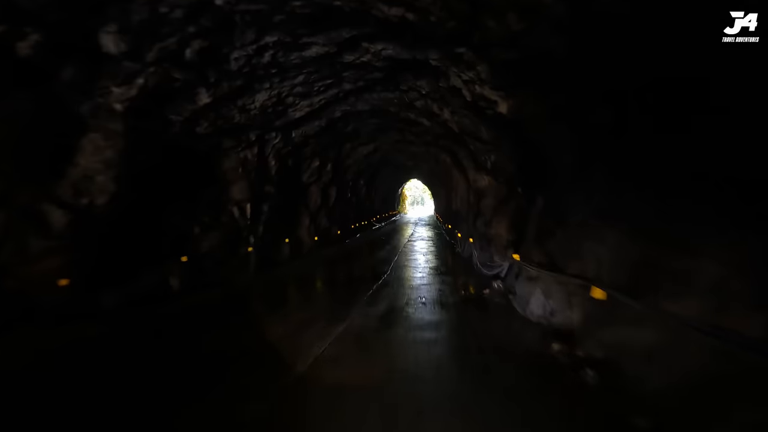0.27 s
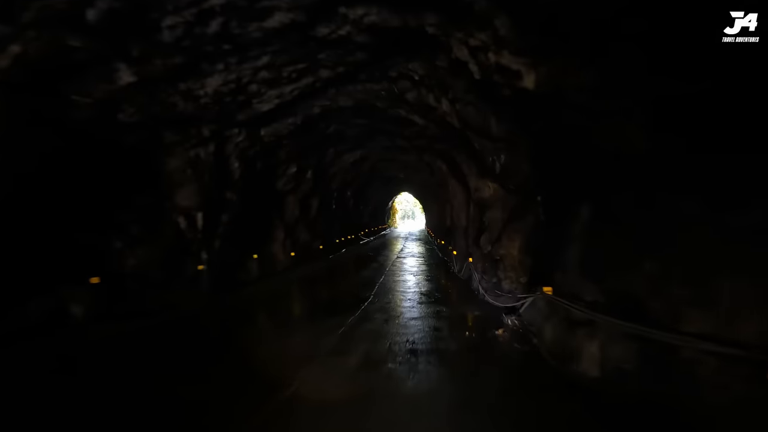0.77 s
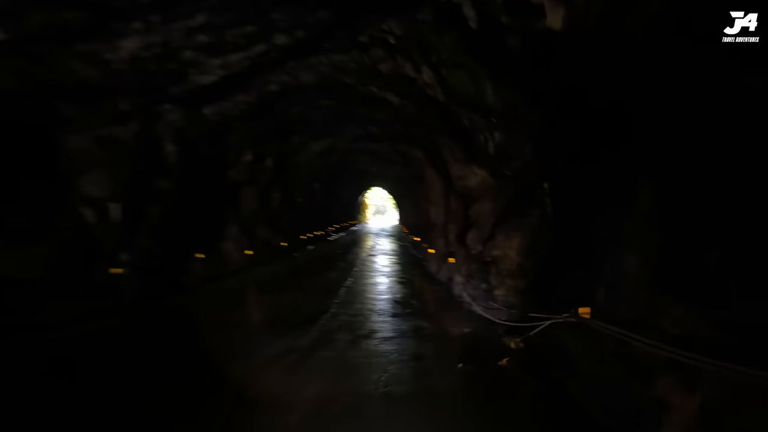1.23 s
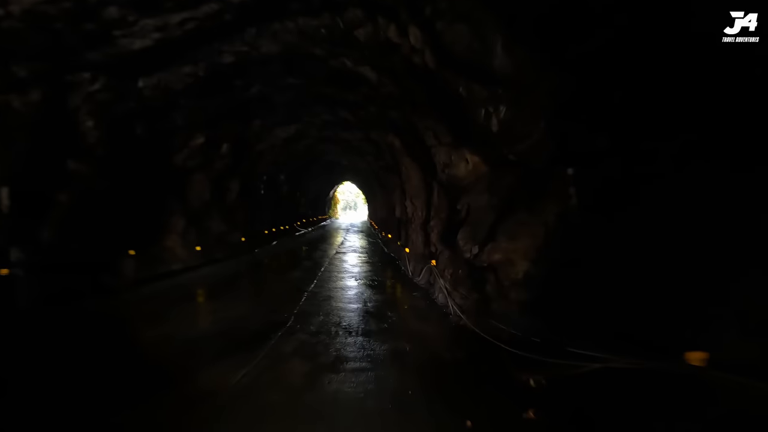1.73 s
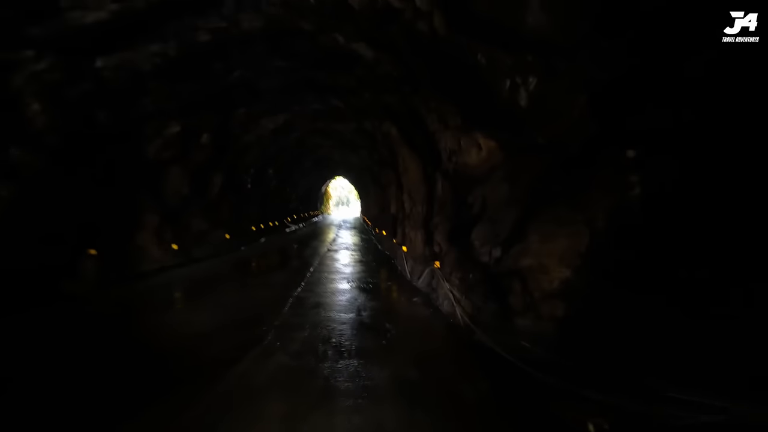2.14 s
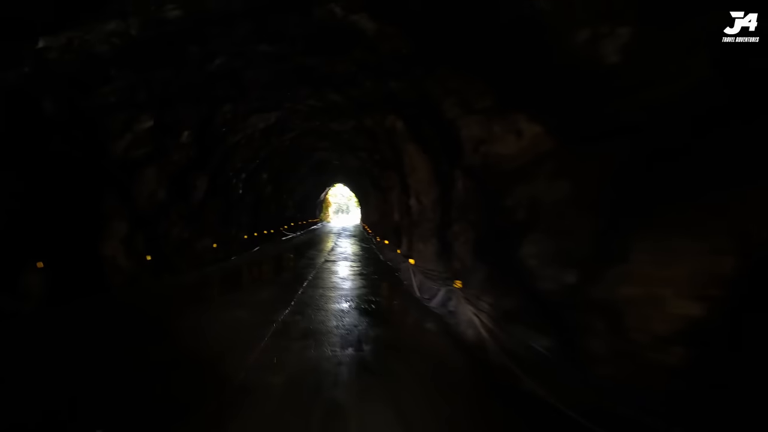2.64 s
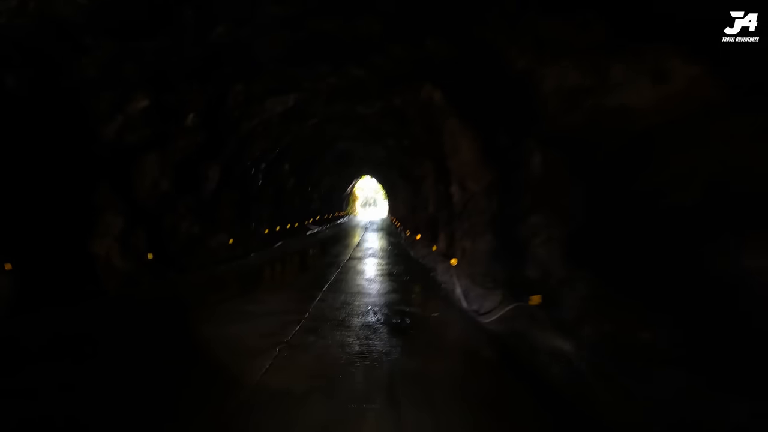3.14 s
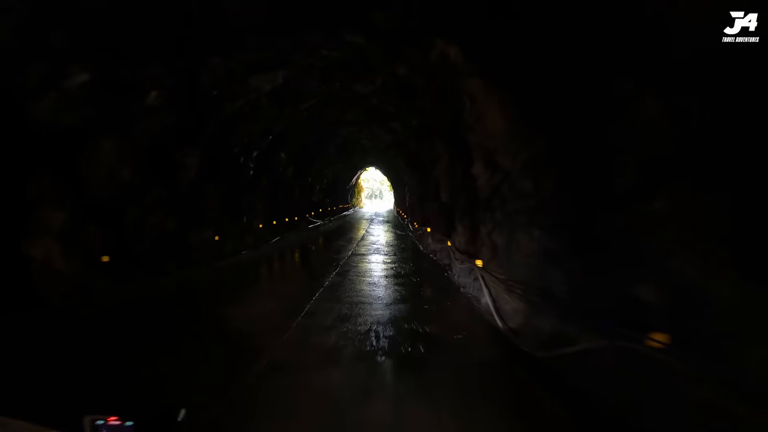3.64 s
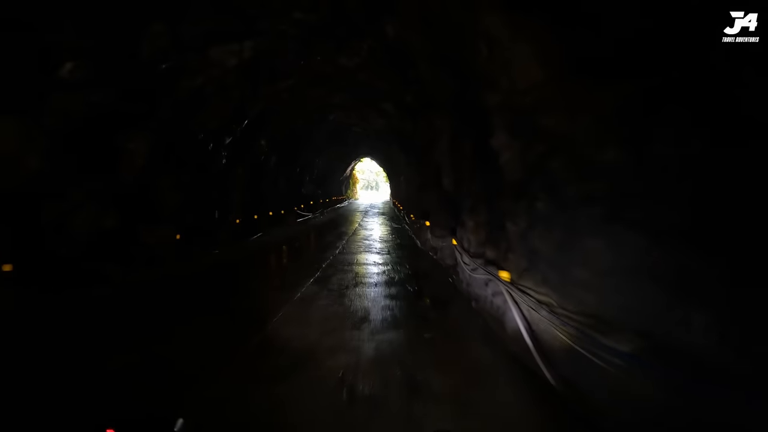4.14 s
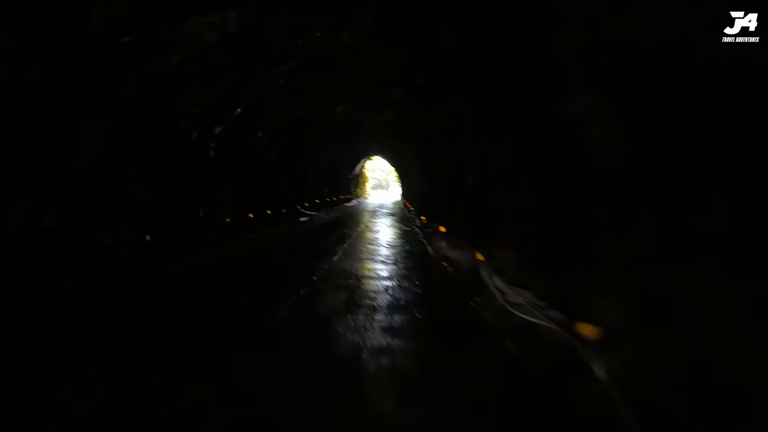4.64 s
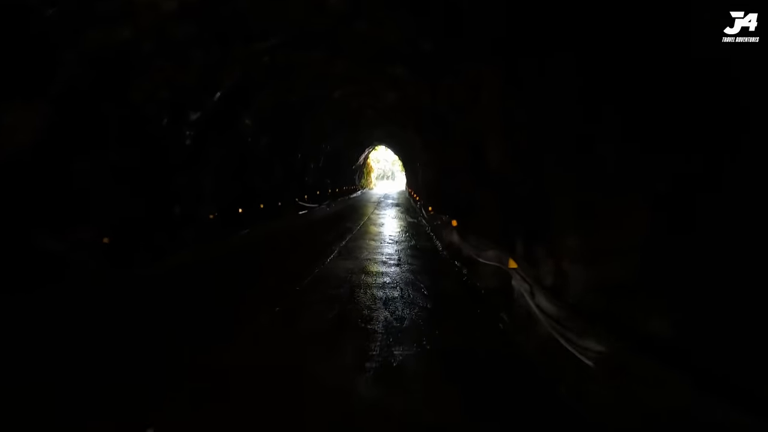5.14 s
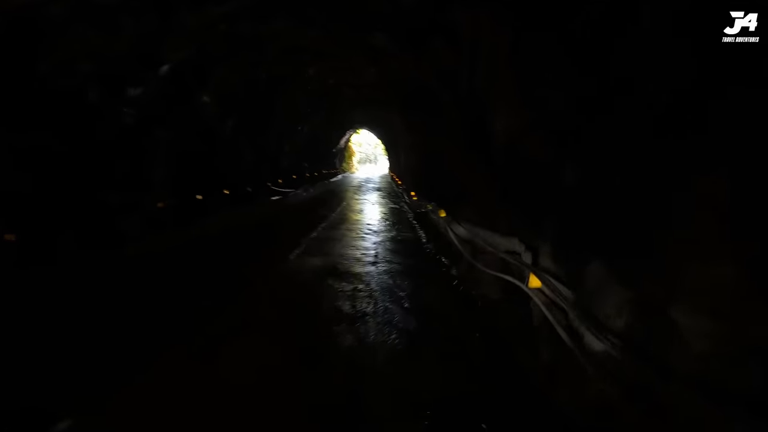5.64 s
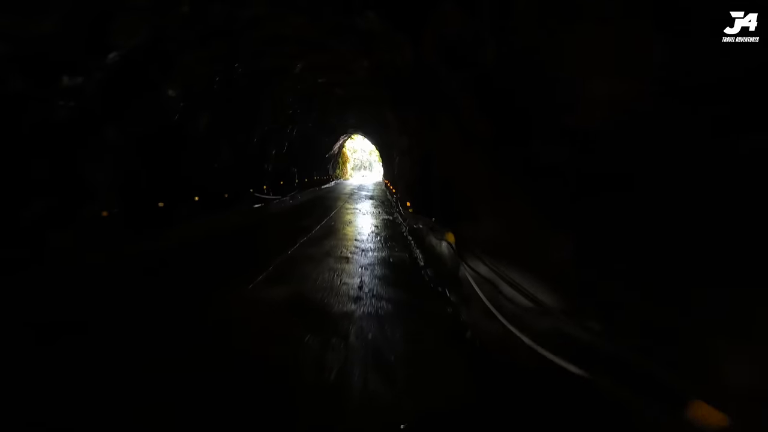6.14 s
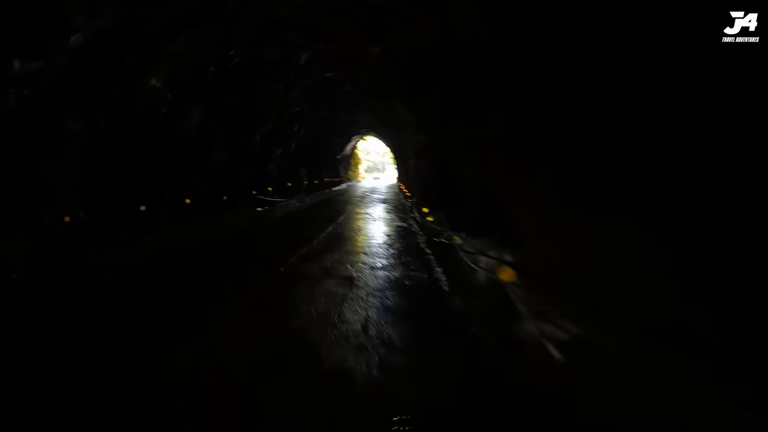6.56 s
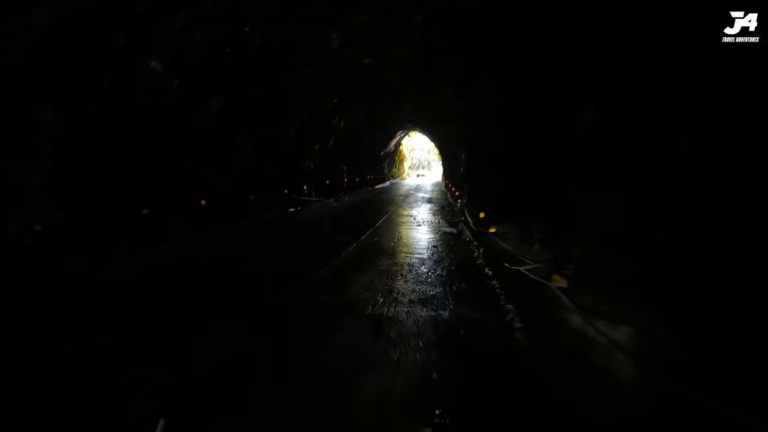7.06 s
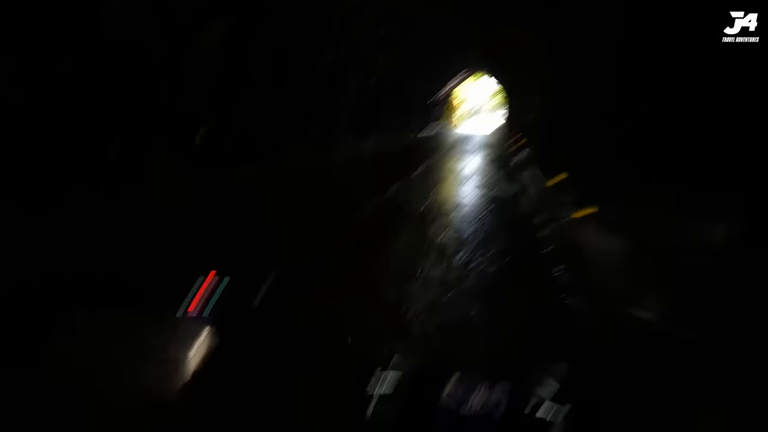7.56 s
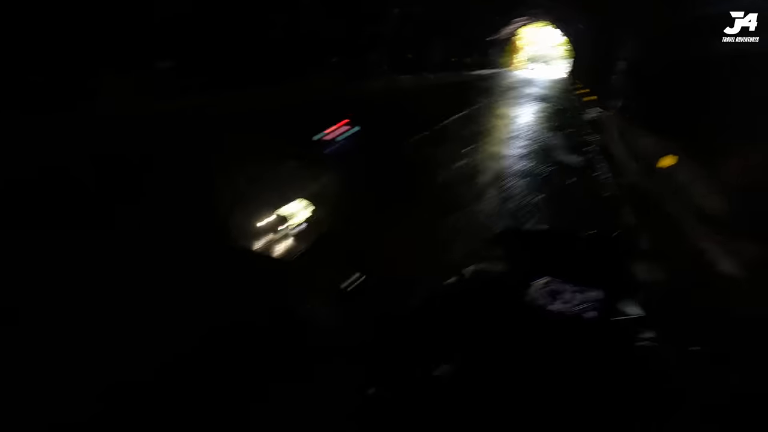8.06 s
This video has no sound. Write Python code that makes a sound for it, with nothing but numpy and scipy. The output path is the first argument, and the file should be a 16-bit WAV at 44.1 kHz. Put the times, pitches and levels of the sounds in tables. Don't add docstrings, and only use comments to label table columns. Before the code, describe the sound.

Two motorcycle engines boom and roar through a wet rock tunnel, one steady, one revved twice, over hissing tyre spray and low road thumps.

```python
import sys
import numpy as np
from scipy import signal
from scipy.fft import rfft, irfft, next_fast_len
from scipy.io import wavfile
from scipy.ndimage import uniform_filter1d, map_coordinates

SR = 44100
rng = np.random.default_rng(int(sys.argv[2]) if len(sys.argv) > 2 else 0)


def convert_level_to_amplitude(level_db):
    exponent = np.asarray(level_db, float) / 20
    return 10 ** exponent


def output_pcm(signal):
    pcm = np.clip(np.atleast_2d(signal).T, -1, 1) * 32767
    wavfile.write(sys.argv[1], SR, np.round(pcm).astype(np.int16))


N = 365588
T = np.arange(N) / SR


def unit(x):
    return x / np.sqrt(np.mean(x ** 2) + 1e-20)


def along(points, hz):
    f, v = np.transpose(points)
    return np.interp(np.log(hz + 1), np.log(f + 1), v)


def curves(rows):
    s, *columns = np.transpose(rows)
    return [np.interp(T, s, column) for column in columns]


def wobble(rate):
    knots = rng.standard_normal(int(N * rate / SR) + 4)
    return map_coordinates(knots, [np.arange(N) * rate / SR])


def hump(middle, length):
    out = np.zeros(N)
    first, last = int((middle - length / 2) * SR), int((middle + length / 2) * SR)
    at = np.arange(max(first, 0), min(last, N))
    out[at] = np.cos(np.pi * (at / SR - middle) / length) ** 2
    return out


def stretches(rows):
    return sum(db * hump(s, length) for s, length, db in rows)


def coloured(x, spectrum):
    m = next_fast_len(N + 8192)
    hz = np.fft.rfftfreq(m, 1 / SR)
    return unit(irfft(rfft(x, m) * convert_level_to_amplitude(along(spectrum, hz)), m)[:N])


def rush(patchy_db):
    z = signal.stft(rng.standard_normal(N), nperseg=512)[2]
    field = uniform_filter1d(rng.standard_normal(z.shape), size=6, axis=0)
    field = uniform_filter1d(field, size=14, axis=1)
    return unit(signal.istft(z * convert_level_to_amplitude(patchy_db * unit(field)), nperseg=512)[1][:N])


def swells(rows):
    out = np.zeros(N)
    for start, end, from_hz, to_hz, db in rows:
        at = np.arange(max(int(start * SR), 0), min(int(end * SR), N))
        u = (at / SR - start) / (end - start)
        hz = from_hz + (to_hz - from_hz) * u
        out[at] += convert_level_to_amplitude(db) * np.sin(np.pi * u) * np.sin(2 * np.pi * np.cumsum(hz) / SR)
    return out


# time in seconds, pitch of the strongest partial in Hz, level in dB.
SQUEAKS = [
    [(1.12, 8890, -81), (1.134, 9330, -72), (1.248, 9570, -72), (1.29, 10250, -76), (1.344, 9805, -74),
     (1.414, 9900, -77), (1.44, 9583, -70), (1.47, 8561, -81)],
    [(5.77, 8810, -74), (5.784, 9250, -71), (5.826, 9250, -72), (5.85, 8900, -74)],
]
# start in seconds, end in seconds, first pitch in Hz, last pitch in Hz, level in dB.
CHIRPS = [(1.09, 1.128, 10280, 10790, -74), (1.15, 1.21, 14600, 15200, -78),
          (1.17, 1.29, 11400, 12200, -79), (1.28, 1.34, 10500, 10600, -80), (1.37, 1.43, 10500, 10600, -80),
          (5.76, 5.85, 10600, 10800, -71)]


def seal():
    out = swells(CHIRPS)
    for rows in SQUEAKS:
        hz, db = curves(rows)
        start, end = rows[0][0], rows[-1][0]
        phase = 2 * np.pi * np.cumsum(hz + 50 * wobble(60)) / SR
        gate = np.clip(np.minimum(T - start, end - T) / .012, 0, 1)
        growth = np.clip((T - start) / .25, 0, 1) ** 2
        subharmonic = .7 * growth * convert_level_to_amplitude(3 * wobble(50)) * np.sin(phase / 2)
        out += gate * convert_level_to_amplitude(db + 4 + 1.5 * wobble(39.4)) * (np.sin(phase) + subharmonic)
    return out


# time in seconds, gulp level in dB, decay in seconds.
SNAPS = [
    (1.87, -55, 0.3),
    (5.272, -53.5, 0.23),
]
# frequency in Hz, level in dB per Hz.
AIRBOX = [(1100, -60), (1600, 1), (2200, 4), (2800, -2), (3400, -4), (5000, -14), (9000, -30), (14000, -80)]


def intake():
    gulp = np.zeros(N)
    for s, db, decay in SNAPS:
        since = np.clip(T - s, 0, None)
        gulp += convert_level_to_amplitude(db) * (1 - np.exp(-since / .008)) * np.exp(-since / decay)
    return gulp * coloured(rng.standard_normal(N), AIRBOX)


COASTING_DB = -39.5
# time in seconds, level in dB.
EFFORT = [(0.0, -34.5), (.44, -39.5), (1.13, -40.5), (1.7, -39.5), (1.95, -37.5), (2.24, -32.5),
          (2.45, -30.5), (2.6, -33), (3.1, -36), (3.97, -35), (4.45, -39), (5.18, -41), (5.42, -34.5),
          (5.9, -31), (6.37, -32), (6.55, -30.5), (7.0, -31.5), (7.4, -32.5)]


def effort():
    return curves(EFFORT)[0]


# middle in seconds, length in seconds, extra spray in dB.
PUDDLE = [
    (2.05, .6, 0.5),
    (3.748, 1.7, 1.5),
    (4.9, .9, 1),
    (6.45, .9, -0.6),
    (7.6, 1.2, 1),
]
# frequency in Hz, level in dB per Hz.
SPRAY = [(900, -66), (1800, 0), (2200, -1), (2700, -1.5), (3250, -0.5), (4200, -7), (5100, -8.5),
         (5600, -9), (7700, -11.5), (9000, -16), (10600, -23.5), (12100, -25), (14000, -23.5), (15500, -28)]
# time in
# seconds, thump level in dB.
BUMPS = [(.03, -38), (1.01, -44), (2.24, -33), (2.72, -33), (3.49, -34), (3.62, -29), (3.79, -30),
         (3.97, -26), (4.33, -27), (5.52, -27), (5.63, -32), (6.05, -27), (6.28, -25), (7.04, -30)]
# frequency in Hz, level in dB per Hz.
RUMBLE = [(6, -45), (15, -14), (24, -3), (32, 0), (42, -2), (52, -4), (66, -9), (90, -30), (200, -120)]


def tyres():
    lag_s, bump_s = 0.2, 0.12
    push_db = uniform_filter1d(effort(), round(lag_s * SR) + 1, mode="nearest") - COASTING_DB
    hiss_db = -58 + 0.95 * push_db + stretches(PUDDLE)
    burst_db = 5.4 * rng.standard_normal(N // 64 + 1)
    drops = rng.standard_normal(N) * convert_level_to_amplitude(burst_db).repeat(64)[:N]
    spray = coloured(rush(patchy_db=0.47) + 0.1 * unit(drops), SPRAY)
    hiss = convert_level_to_amplitude(hiss_db + 0.12 * wobble(10) + 0.31 * wobble(30)) * spray
    roughness = convert_level_to_amplitude(-49 + 0.98 * push_db + 5 * wobble(9.8))
    thumps = sum(convert_level_to_amplitude(db) * hump(s, bump_s) for s, db in BUMPS)
    return hiss + (roughness + thumps) * coloured(rng.standard_normal(N), RUMBLE)


# start in seconds, end in seconds, first pitch in Hz, last pitch in Hz, level in dB.
DRONES = [(-.3, 1.16, 131.8, 131.5, -38.5), (3.3, 4.1, 139.6, 138.1, -38), (1.3, 1.6, 107.7, 110, -46),
          (1.5, 2.3, 96, 95.4, -36), (2.2, 3.1, 50.1, 50.4, -39), (2.55, 3.27, 179, 176.3, -37),
          (3.05, 4, 88.28, 85.54, -33), (3.25, 4.25, 34.17, 34.4, -34), (3.6, 4.6, 118.9, 113.1, -35.5),
          (6.3, 7.47, 49.93, 49.38, -29), (6.7, 7.3, 180.2, 179, -34.5), (7.55, 8.6, 147.1, 145.9, -34.5),
          (7.55, 8.54, 170.9, 175.3, -37.5)]


def standing_waves():
    return swells(DRONES)


# frequency in Hz, decay time T60 in seconds.
ROCK = [(60, 1.15), (500, 1.43), (2000, 0.66), (8000, 0.34)]


def walls(x):
    hop = SR // 2
    out = np.zeros(N + 4 * SR)
    padded = np.pad(x, (hop, 2 * hop))
    for start in range(0, N + hop, hop):
        hz, t, z = signal.stft(rng.standard_normal(SR), SR, nperseg=256)
        decay_db = -60 * t / along(ROCK, hz)[:, None]
        tail = signal.istft(z * convert_level_to_amplitude(decay_db), SR, nperseg=256)[1]
        wet = signal.fftconvolve(padded[start:start + 2 * hop] * np.hanning(2 * hop), tail)
        out[start:start + len(wet)] += wet
    return unit(out[hop:hop + N])


def firings(turns, jitter_s, scatter_db):
    at = np.flatnonzero(np.diff(np.floor(turns)))
    chance = rng.standard_normal((len(at), 2))
    at = np.clip(at + np.round(jitter_s * SR * chance[:, 0]).astype(int), 0, N - 1)
    return np.bincount(at, convert_level_to_amplitude(scatter_db * chance[:, 1]), N)


# frequency in Hz, level in dB per Hz.
BOOM = [(40, -57), (65, 9), (85, 0), (105, 6), (140, 7), (175, -4), (200, -15), (240, -44), (400, -120)]
# middle in seconds, length in seconds, extra boom in dB.
WIDER = [
    (.5, 0.7, -1),
    (3.296, 1.5, 1),
    (5.2, 1.81, -2.5),
    (7.75, .6, -2.5),
    (8.29, 0.27, 6),
]
# frequency in Hz, level in dB per Hz.
ROAR = [(110, -37), (170, -1.5), (210, -1.5), (240, -2.5), (330, 0), (450, -2.5), (620, -1.5), (800, -7),
        (920, -8), (1020, -11), (1300, -8), (1600, -15), (1850, -22), (2200, -37), (3500, -120)]
# frequency in Hz, level in dB per Hz.
COAST = [(120, -58), (190, -7), (250, -5.5), (330, -0.5), (450, -3.5), (620, -5), (900, -10.5),
         (1020, -12.5), (1300, -11.5), (1600, -16.5), (1850, -25), (2200, -34), (3500, -120)]


def exhausts(revved_turns, even_turns):
    beats = firings(revved_turns, jitter_s=0.000809, scatter_db=2.5)
    beats = beats + 0.82 * firings(even_turns, jitter_s=0.00081, scatter_db=2.5)
    blast = 0.53 * walls(beats) + 0.9 * rush(patchy_db=0.7)
    roar_db = effort()
    boom_db = -35.5 + 0.18 * (roar_db - COASTING_DB) + stretches(WIDER) + 1.05 * wobble(7.1)
    throttle = np.clip((roar_db + 40.5) / 7.8, 0, 1)
    pipe = throttle * coloured(blast, ROAR) + (1 - throttle) * coloured(blast, COAST)
    return convert_level_to_amplitude(boom_db) * coloured(blast, BOOM) + convert_level_to_amplitude(roar_db + 0.73 + 0.58 * wobble(12)) * pipe


def orders(rows, multiples, spots, drift):
    faint_db = -65.5
    rate_hz, first_db = curves(rows)
    turns = np.cumsum(rate_hz) / SR
    gains = [convert_level_to_amplitude(first_db)]
    for loud in spots:
        gains.append(convert_level_to_amplitude(faint_db) + sum(convert_level_to_amplitude(db) * hump(s, length) for s, length, db in loud))
    tones = np.zeros(N)
    for k, gain in zip([1] + multiples, gains):
        phase = 2 * np.pi * k * turns + drift * np.sqrt(k) * wobble(3) + rng.uniform(0, 2 * np.pi)
        tones += gain * convert_level_to_amplitude(1.5 * wobble(6)) * np.sin(phase)
    return np.sqrt(2) * tones, turns


# time in seconds, firing rate in Hz, level of the first order in dB.
EVEN = [(0.0, 28.81, -29.5), (0.3, 28.44, -38), (1.0, 28.22, -40), (1.6, 28.27, -44), (2.2, 28.05, -37),
        (2.7, 28.24, -57), (3.1, 27.75, -40), (3.6, 27.89, -58), (4.1, 27.86, -45), (4.7, 27.8, -32),
        (5.0, 27.88, -36.5), (5.6, 28.1, -39.5), (6.1, 28.88, -38), (6.9, 28.68, -48), (7.7, 27.75, -59),
        (8.29, 27.63, -50)]
EVEN_ORDERS = [2, 3.5, 6]
# middle in seconds, length in seconds, level in dB.
EVEN_SPOTS = [
    [(2.05, 0.59, -48), (4.8, .4, -37.5), (6.2, 1.0, -25.5), (7.0, 0.49, -27.5), (7.35, 0.49, -31.5),
     (7.8, 0.43, -34), (8.25, 0.49, -33)],
    [(1.15, 0.76, -34), (1.65, 0.66, -38), (4.3, .6, -41), (4.9, 0.33, -43), (5.5, 1, -37.5),
     (7.35, .6, -40), (8.0, 0.39, -44)],
    [(.3, 0.44, -43), (1.25, 1.4, -39.5), (3.6, 0.65, -40), (4.0, .4, -41), (6.85, .7, -41.5),
     (7.8, .4, -33)],
]


def even_engine():
    return orders(EVEN, EVEN_ORDERS, EVEN_SPOTS, drift=0.41)


# time in seconds, firing rate in Hz, level of the first order in dB.
REVVED = [(1.75, 19, -55), (2.15, 37.4, -38), (2.35, 38.4, -36), (2.7, 38.6, -35), (2.95, 39.2, -42),
          (3.4, 38.6, -35), (3.85, 41.8, -30.5), (4.15, 38, -31), (4.4, 36, -34), (4.75, 36.6, -34.5),
          (5.15, 31.2, -47), (5.55, 35.5, -31.5), (5.75, 37.2, -30.5), (6.15, 37.8, -24),
          (6.55, 35.5, -34.5), (6.95, 35.2, -32), (7.2, 34.2, -26.5), (8.29, 34.5, -28.5)]
REVVED_ORDERS = [1.5, 2, 4, 6]
# middle in seconds, length in seconds, level in dB.
REVVED_SPOTS = [
    [(2.35, .4, -46), (4.15, 0.43, -37.5), (5.35, .4, -35.5), (6.0, .5, -45), (7.8, 1.21, -32.5)],
    [(2.05, .6, -36.5), (4.3, .6, -38), (5.8, 1.13, -34.5), (7.05, 0.63, -28.5), (7.45, 0.77, -35)],
    [(2.5, 1.0, -33), (3.15, 0.99, -38), (4.75, .4, -45), (6.3, .9, -37), (7.4, 0.66, -35.5),
     (7.8, .8, -44)],
    [(3.75, .5, -43), (6.75, .5, -37), (7.2, 0.64, -40)],
]


def revved_engine():
    tones, turns = orders(REVVED, REVVED_ORDERS, REVVED_SPOTS, drift=0.69)
    return tones * np.clip((T - 1.7) / 0.13, 0, 1), turns


def scene():
    even, even_turns = even_engine()
    revved, revved_turns = revved_engine()
    engines = revved + even + exhausts(revved_turns, even_turns)
    return (seal() + intake() + tyres() + standing_waves() + engines)[None]


def band_limit(x):
    return signal.sosfilt(signal.butter(12, 15620, fs=SR, output="sos"), x)


def record(dry):
    soft = dry / (1 + np.abs(dry / .3) ** 4) ** (1 / 4)
    return band_limit(soft)


dry = scene()
out = record(dry)
output_pcm(out)
```